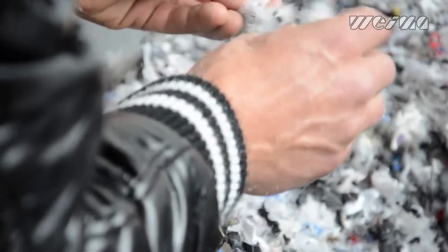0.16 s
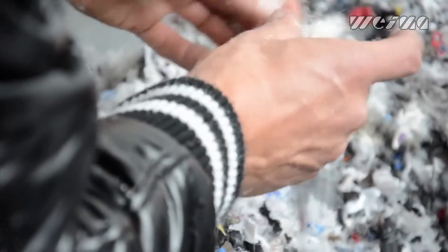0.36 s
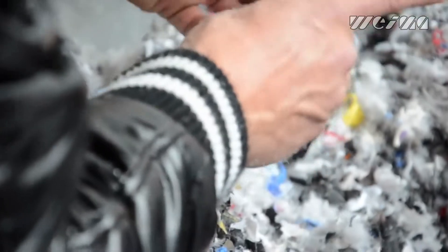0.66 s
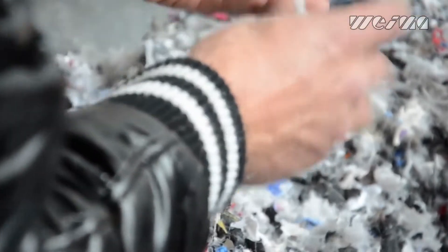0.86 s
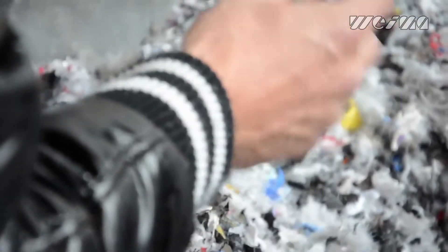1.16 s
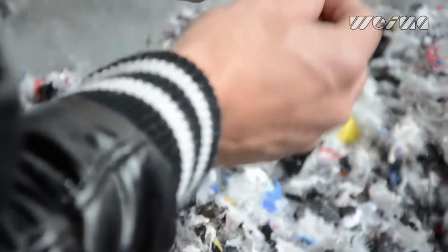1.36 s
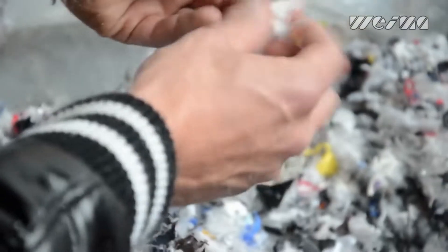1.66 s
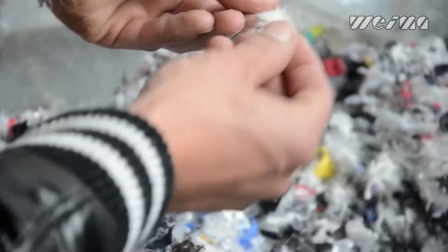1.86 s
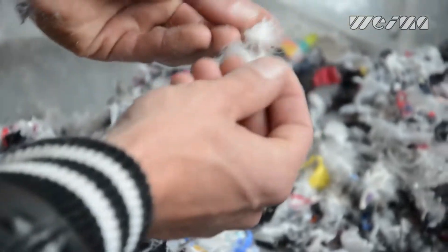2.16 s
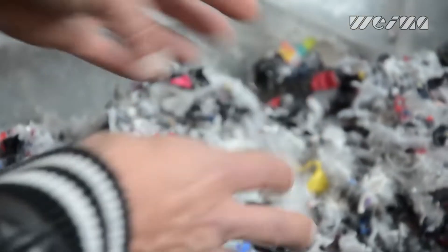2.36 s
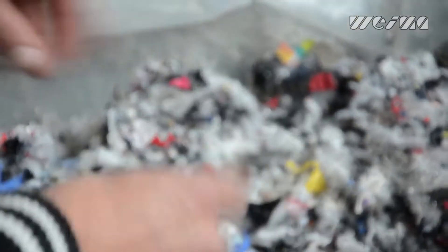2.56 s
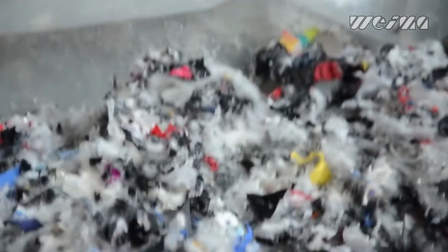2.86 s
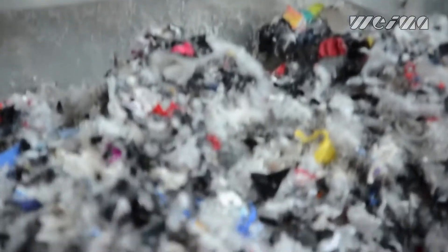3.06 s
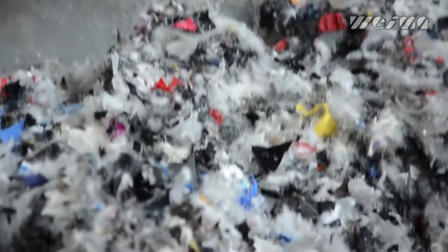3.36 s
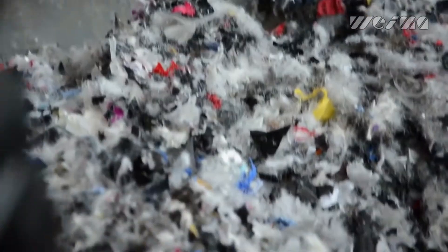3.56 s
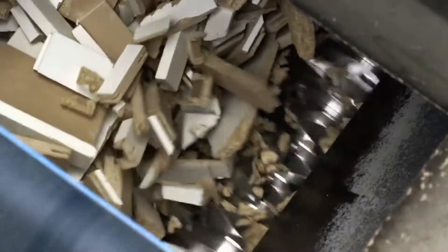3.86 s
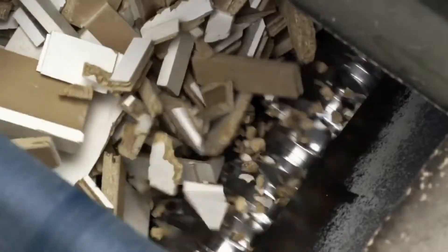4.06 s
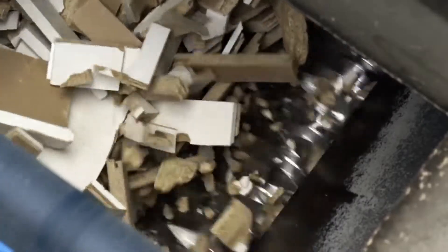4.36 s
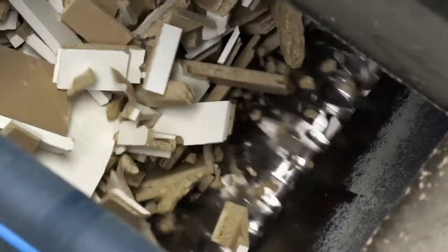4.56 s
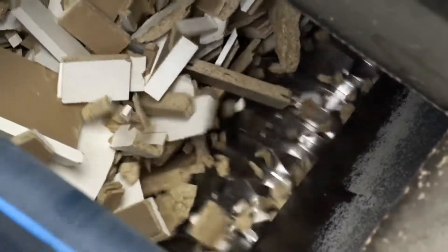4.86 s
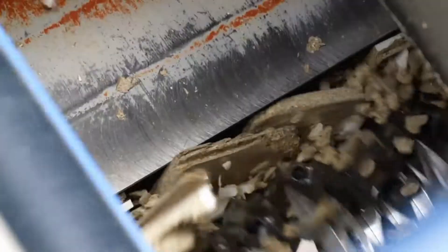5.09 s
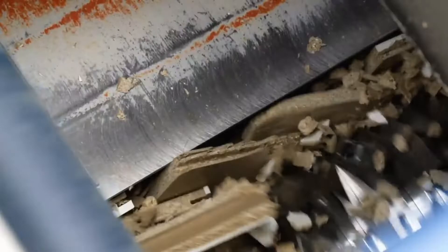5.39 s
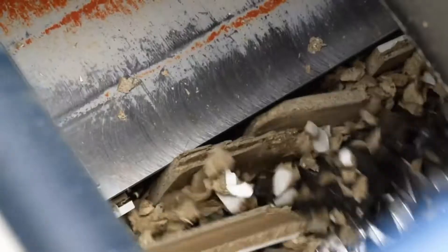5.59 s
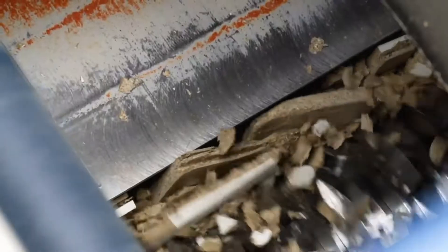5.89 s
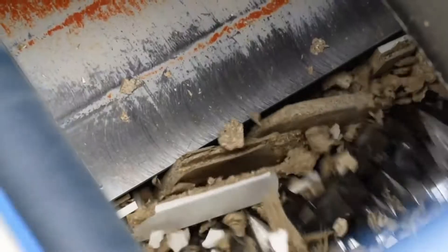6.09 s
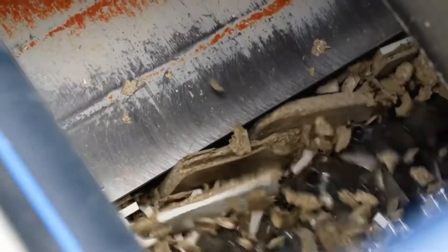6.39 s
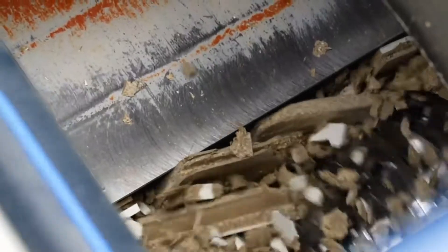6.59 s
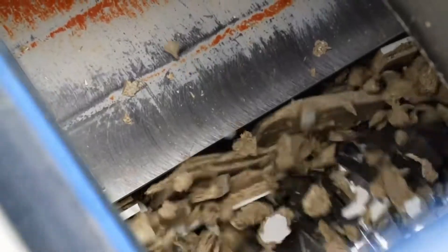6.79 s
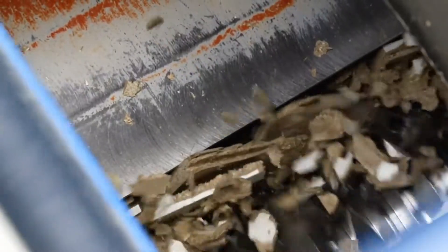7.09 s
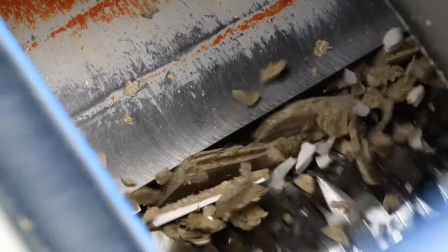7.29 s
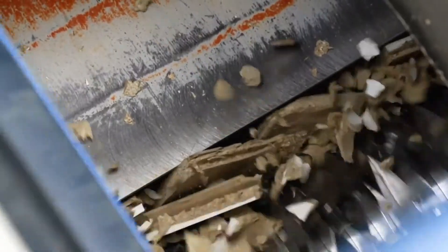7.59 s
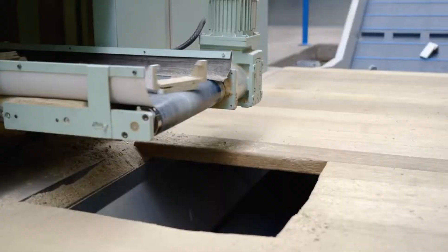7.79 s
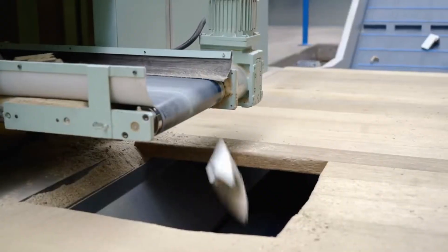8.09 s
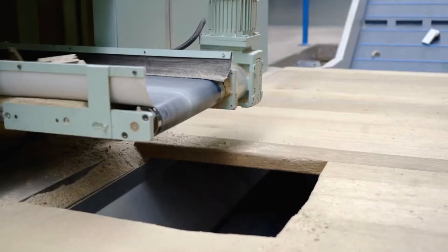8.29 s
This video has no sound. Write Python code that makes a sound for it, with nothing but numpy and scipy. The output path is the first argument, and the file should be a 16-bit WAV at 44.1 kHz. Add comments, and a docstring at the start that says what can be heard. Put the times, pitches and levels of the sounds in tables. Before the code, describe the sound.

Close stereo microphones catch a dense, full-bodied machine roar with ripping cloth and uneven bites, knocks and crisp snaps. It falls away abruptly into a low coasting rumble with muffled thuds. Then chipboard crunches and splinters over a mains hum and a quick regular rotor thump, with woody chips ticking and ringing in a steel hopper. Loose metal parts clack repeatedly near the end as the whole sound fades nearly to nothing.

```python
"""A textile shredder leads: its housing rumbles, fabric rushes and tears, lumps thud and hard scraps snap.
As it runs down, a wood shredder takes over with a mains hum and a rotor that thumps once a turn. Chipboard
grinds and splinters, chips bounce in the steel hopper and machine parts clack, in one long fade.
Shaped noise makes the roar, wavering sines the hums, and short decaying modes the knocks, chips and clacks.
Stereo microphones hear both places, with less left-right likeness in the high treble."""
import sys
import numpy as np
from scipy import signal
from scipy.fft import rfft, irfft, next_fast_len
from scipy.io import wavfile
from scipy.ndimage import uniform_filter1d

SR = 44100
rng = np.random.default_rng(int(sys.argv[2]) if len(sys.argv) > 2 else 0)


def materialize(psi):
    """Save the field psi as 16-bit PCM at rate SR to the path in sys.argv[1].

    A 1-D psi becomes a single channel; in a 2-D psi each row is a channel.
    """
    bounded = np.clip(np.atleast_2d(psi).T, -1, 1)
    quanta = np.round(bounded * 32767).astype(np.int16)
    wavfile.write(sys.argv[1], SR, quanta)


N = 372204
TIME = np.arange(N) / SR  # s
BINS = np.fft.rfftfreq(N, 1 / SR)  # Hz

# Spectra give relative level; each is scaled to an even loudness before its own level is set.
# textile shredder, rumble of the housing: (frequency [Hz], density [dB per Hz])
HOUSING_SPECTRUM = [(28, -34), (45, -27.5), (62, -19.5), (103, -10.5), (125, -9), (141, -8), (157, -8),
                    (180, 0), (215, -2), (250, -2), (303, 1.5), (322, -14), (340, -8), (380, -12)]
# level of that rumble as the feed swells and slackens: (time [s], level [dB])
RUMBLE_LEVEL = [(0, 6), (.07, 0), (.3, 0), (.62, -2), (.76, 2), (.95, 1), (1.15, 0), (1.35, 3), (1.58, -2),
                (1.72, 1.5), (1.95, 2), (2.08, -4), (2.19, 3), (2.28, -2), (2.42, 2.5), (2.49, 0), (2.6, 2),
                (2.72, 1)]
# rush of dragged fabric: (frequency [Hz], density [dB per Hz])
RUSH_SPECTRUM = [(190, -28.5), (330, -7), (368, -6.5), (429, -1.5), (490, -7.5), (924, -6.5), (1010, -11.5),
                 (1180, -10), (1740, -22), (2100, -25.5), (2730, -49), (4620, -120)]
# tearing fabric: (frequency [Hz], density [dB per Hz])
TEARING_SPECTRUM = [(1600, 16), (2050, -2), (2350, -1.5), (3100, -1.5), (3900, -4.5), (4900, -2.5),
                    (5700, -3.5), (6700, -9), (7400, -9), (8100, -7.5), (9900, -16.5), (11800, -12),
                    (14500, -17.5), (15400, -20.5)]
# the rotor bites into a wad of fabric: (start [s], length [s], extra rush [dB], extra tearing [dB])
BITES = [(0.0, 0.1, 2.5, 2), (0.412, 0.087, 0.5, 4), (0.764, 0.26, 1, 1), (1.284, 0.17, 2.5, 2.5),
         (1.633, 0.095, 4.5, 3.5), (1.783, 0.035, 3, 3), (1.914, 0.048, 3.5, 0.5), (2.184, 0.027, 5.5, 7.5),
         (2.484, 0.073, 2.5, 4.5), (2.585, 0.028, 0.5, 2)]
# the textile shredder running light: (frequency [Hz], density [dB per Hz])
COASTING_SPECTRUM = [(30, -24.5), (66, -9), (100, -4), (181, -0.5), (300, -1), (357, -9.5), (1180, -16),
                     (2050, -20.5), (2350, -18), (5700, -26), (6600, -31.5), (8200, -31), (9500, -39),
                     (12000, -37.5), (15200, -43)]
# level of the machine running light: (time [s], level [dB])
COASTING_LEVEL = [(2.68, -92), (2.78, -41.5), (3.12, -40.5), (3.35, -45.5), (3.65, -44), (3.95, -59),
                  (4.2, -110)]
# tones of the drive: (frequency [Hz], level before the drive curve [dB])
DRIVE_TONES = [(58.8, -57.5), (119.8, -48), (175.5, -55.5), (234.8, -48.5), (705, -59.5), (2351, -67.5),
               (4224, -69.5), (4986, -75)]
# drive curve, falling as the load drops away: (time [s], level [dB])
DRIVE_LEVEL = [(0, 3), (2.72, 3.5), (2.9, -10), (3.5, -11), (3.9, -53), (4.2, -90)]
# lumps knocking in the cutting chamber: (time [s], level [dB], pitch [Hz], spread [Hz], t60 [s])
LUMPS = [(.505, -46.5, 1260, 502, 0.041), (.842, -44, 990, 302, 0.064), (1.644, -49, 850, 706, 0.095),
         (1.70, -47.5, 814, 720, 0.13), (1.797, -44, 880, 298, 0.063), (1.941, -51, 880, 300, 0.077),
         (2.198, -39.5, 596, 647, 0.25), (2.411, -44, 700, 249, .07), (2.578, -46.5, 1110, 351, 0.077),
         (2.633, -52, 880, 299, 0.062), (2.72, -36.5, 173, 35, 0.22), (2.805, -43.5, 274, 70.5, 0.085),
         (2.878, -39, 250, 79.8, 0.092), (2.952, -37.5, 210, 100, 0.043), (3.01, -42, 115, 70.2, 0.14),
         (3.058, -42, 190, 90, 0.085), (3.222, -45, 200, 130, .06), (3.31, -45.5, 160, 100, .06),
         (3.425, -55, 260, 79.8, 0.2), (3.04, -48.5, 1100, 500, 0.22), (3.12, -45.5, 1160, 447, 0.27),
         (3.14, -51, 1113, 500, 0.25), (3.535, -45.5, 780, 604, 0.27), (3.566, -51, 780, 600, 0.51),
         (3.6, -46, 428, 70, 0.2), (3.768, -51, 990, 250, 0.076)]
# hard scraps snapping: (time [s], level before SNAP_TRIM_DB [dB], pitch [Hz], spread [Hz], t60 [s])
SNAPS = [(.245, -47, 2820, 900, .03), (.426, -49, 2020, 700, .04), (.462, -55, 4930, 2000, .04),
         (.503, -41, 4760, 2700, 0.04), (.586, -49, 1770, 600, .03), (.621, -46.5, 3780, 1200, .05),
         (.815, -47.5, 2420, 805, 0.067), (1.288, -53, 3500, 1100, .04), (1.434, -45, 1760, 600, .04),
         (1.623, -47.5, 5600, 1500, .03), (1.638, -45.5, 4500, 2950, 0.061),
         (1.667, -46.5, 3280, 1780, .05), (1.702, -50.5, 2220, 900, .04), (1.781, -47, 3250, 900, .04),
         (1.808, -46, 3360, 886, 0.044), (1.852, -51, 3130, 900, 0.032), (2.089, -49.5, 3530, 1000, .03),
         (2.16, -45, 5600, 1500, .04), (2.189, -49, 4020, 2960, .12), (2.213, -47.5, 4370, 1500, .04),
         (2.229, -52, 1750, 700, .04), (2.479, -47.5, 1570, 503, 0.054), (2.532, -49.5, 2470, 800, .04),
         (2.623, -43, 3110, 890, .05), (2.808, -52, 2800, 1000, .05), (2.851, -51, 5030, 1390, .04),
         (2.942, -54, 3100, 1000, .04), (3.175, -50, 3150, 990, .04), (3.372, -57, 4370, 1300, .04),
         (3.535, -47.5, 3280, 2080, 0.066), (3.572, -49, 2620, 1470, 0.061), (3.671, -52, 2180, 900, .06),
         (3.771, -59.5, 3170, 1000, .04), (3.84, -53, 2490, 800, 0.069)]
# wood shredder, mains hum: (frequency [Hz], level relative to HUM_DB [dB])
HUM_TONES = [(58.4, -8.5), (120, 3), (180, -7.5), (240, -2.5), (360, -9), (479, -33)]
# shaking steel frame: (frequency [Hz], density [dB per Hz])
FRAME_SPECTRUM = [(25, -10), (42, -22), (60, -7), (85, -8), (125, -3), (145, -2.5), (175, -3.5),
                  (215, -4.5), (260, 1), (300, 3), (340, -6), (420, -5), (520, -13.5)]
# the rotor labours on a thick board: (time [s], extra level [dB])
LABOUR_LEVEL = [(4.38, 0), (4.5, 2), (4.78, 1.5), (4.88, 0.5)]
# grinding chipboard: (frequency [Hz], density [dB per Hz])
GRINDING_SPECTRUM = [(450, -13), (523, 4.5), (714, 3.5), (928, 0), (1010, -4.5), (1180, -2.5), (1390, -4.5),
                     (1540, 0.5), (1700, -18), (2000, -15)]
# splintering chipboard: (frequency [Hz], density [dB per Hz])
SPLINTERING_SPECTRUM = [(1790, 1.5), (2080, -8), (2330, -2.5), (3100, -7.5), (3750, -12), (4500, -7.5),
                        (5820, -10), (6520, -16.5), (8180, -13.5), (9970, -24), (11500, -18), (13000, -22),
                        (13700, -23), (15200, -42)]
# larger chips landing in the hopper:
# (time [s], level before the fade [dB], pitch [Hz], hopper echo before HOPPER_DB [dB])
CHIPS = [(3.910, -61, 3930, -9), (3.957, -55, 1570, -2), (3.958, -56, 6400, -4), (4.049, -56.5, 2560, -1),
         (4.071, -56.5, 1120, -6), (4.159, -61, 3140, -3), (4.214, -62, 5600, -3), (4.236, -61, 10700, -4),
         (4.292, -54, 4380, -3), (4.298, -57, 2460, -6), (4.348, -52.5, 7600, -3), (4.471, -51, 3220, -12),
         (4.482, -54, 2960, -9), (4.543, -58, 2750, -5), (4.574, -58, 7460, -8), (4.586, -63, 2200, -7),
         (4.687, -65, 2480, -8), (4.704, -58, 5460, 1), (4.764, -56.5, 3940, -4), (4.917, -59.5, 1600, 2),
         (4.966, -50.5, 2950, -4), (4.988, -51.5, 4950, -7), (5.068, -57, 2790, 3), (5.075, -53, 4140, 0),
         (5.102, -60, 5560, -3), (5.200, -59, 3270, -5), (5.167, -60, 9400, -3), (5.169, -49, 4600, -2.5),
         (5.218, -54, 1425, 3), (5.232, -60, 8600, 0), (5.236, -57, 2950, -4), (5.350, -62, 9900, -8),
         (5.381, -63, 3860, 0), (5.39, -57, 1140, -3), (5.402, -62, 2660, -1), (5.420, -54, 2350, -2),
         (5.423, -58, 1580, -12), (5.492, -60.5, 7200, -3), (5.544, -46.5, 2450, -9), (5.569, -55, 1430, 4),
         (5.576, -53.5, 3270, -7), (5.577, -64, 8700, -2), (5.600, -57, 2550, -9), (5.658, -61, 3900, 1),
         (5.693, -52.5, 1087, -2), (5.694, -63, 3530, -5), (5.712, -56.5, 3250, -9), (5.759, -54, 2430, -4),
         (5.772, -54, 2470, -13), (5.822, -52, 1710, -12), (5.846, -65, 1610, -4), (5.865, -59, 1770, -14),
         (5.940, -66, 7640, 0), (5.963, -66, 8950, -2), (5.973, -58.5, 1480, -4), (6.000, -57, 1230, -3),
         (6.005, -53, 2710, 1), (6.029, -58, 3050, -2), (6.056, -59, 2340, -2), (6.067, -62, 2490, -4),
         (6.075, -48, 1546, 1), (6.086, -50, 1610, -5), (6.087, -66, 8000, -8), (6.097, -62, 2350, -1),
         (6.114, -63, 1770, 0), (6.220, -57, 3920, -2), (6.281, -62, 5740, -1), (6.294, -58, 1620, -1),
         (6.307, -58, 4350, -2), (6.390, -47.5, 1334, 3), (6.396, -62, 3670, 4), (6.419, -60, 2220, -4),
         (6.449, -65, 6310, 2), (6.462, -48, 1610, -1), (6.475, -52.5, 2990, 5.5), (6.475, -63, 6160, 1),
         (6.500, -62, 1650, -5), (6.553, -50, 2450, -6), (6.561, -54, 2470, -2), (6.597, -57, 2410, -3),
         (6.632, -63, 2860, -1), (6.676, -55, 2330, -13), (6.782, -61, 2220, -1), (6.800, -62, 4340, -1),
         (6.803, -59, 11100, -6.5), (6.832, -55, 2720, 0), (6.922, -58.5, 2790, 0), (6.927, -62, 3680, 1),
         (6.934, -62, 9790, 0), (6.953, -61, 5740, 1), (7.018, -62, 5600, -1), (7.033, -62, 7750, -5),
         (7.045, -55.5, 2060, -5), (7.123, -62, 4500, 3), (7.191, -53.5, 4820, -2), (7.214, -61, 2290, 6),
         (7.297, -51, 3390, -6), (7.427, -58.5, 3540, 3), (7.478, -58, 2530, 6), (7.515, -60, 2470, -5),
         (7.549, -57, 9100, -10), (7.555, -55, 4290, 1), (7.582, -57, 3630, 1), (7.683, -58, 2940, 1),
         (7.693, -56.5, 5460, 1), (7.694, -57, 1750, 2), (7.793, -56, 3830, -2), (7.815, -64, 5600, -3),
         (7.951, -63, 5730, -3), (7.964, -57, 3300, -3), (7.987, -48.5, 1580, -1), (8.002, -51, 2320, 7),
         (8.004, -53, 6700, -5), (8.051, -52, 4290, -3), (8.216, -60, 2490, 0)]
# ring of a chip: (multiple of its pitch [ratio], relative level [dB])
CHIP_MODES = [(.42, -17), (.58, -14), (.74, -12), (.87, -8), (.95, -4), (1, 0), (1.06, -4), (1.16, -9),
              (1.42, -14), (2.05, -18)]
# machine parts clack, now and then, later twice and then three times a turn:
# (time [s], peak level before the fade [dB])
CLACKS = [(4.459, -44.5), (4.483, -39), (4.636, -46), (4.769, -45), (5.124, -44), (5.299, -45),
          (5.463, -49), (6.152, -47), (6.278, -44), (6.350, -49), (6.701, -45.5), (6.802, -51),
          (6.890, -46), (6.976, -44), (7.066, -45), (7.159, -47.5), (7.248, -44), (7.343, -45),
          (7.434, -42), (7.529, -45), (7.643, -42.5), (7.718, -43.5), (7.784, -45.5), (7.852, -44),
          (7.908, -46), (7.973, -42), (8.077, -44), (8.145, -42), (8.202, -43), (8.264, -39.5),
          (8.326, -41.5)]
# ring of the clacking parts: (frequency [Hz], relative level [dB], t60 [s])
CLACK_MODES = [(290, -3, .03), (1183, -4, 0.063), (1384, 1.5, 0.049), (1470, 5, 0.059), (1835, 3, 0.038),
               (2060, -5, 0.017), (2350, 7.5, 0.024), (2660, 0.5, 0.023), (2950, -5, .01),
               (3460, -9, 0.0069), (4170, 2, 0.006), (5730, 3, 0.0045), (7800, -5, 0.0028)]
# grit and crumbs ticking on the hopper walls: (frequency [Hz], density [dB per Hz])
GRIT_SPECTRUM = [(900, 0), (1500, 2.5), (2600, -0.5), (4200, -12), (6000, -16), (9000, -28), (14000, -27)]
# likeness of the two microphones: (frequency [Hz], left-right likeness [0 to 1])
ALIKE = [(40, 0.66), (120, 0.73), (280, 0.95), (650, 0.83), (1300, 0.81), (2400, 0.86), (4400, 0.73),
         (8000, .42), (14500, .1)]
# balance of the two microphones: (frequency [Hz], left minus right [dB])
LEFT_BALANCE = [(40, 12.5), (70, -5.5), (130, -1.5), (260, 1), (1000, 2), (2200, 0.8), (4000, 2.2),
                (8000, 1.5), (12000, 3.5)]

# textile shredder's base levels, before the bites and the rumble curve
RUMBLE_DB, RUSH_DB, TEARING_DB = -34, -42.5, -47.5
BITE_ATTACK_S, BITE_RELEASE_S = 0.022, 0.078
RUMBLE_FOLLOWS = .3  # dB of rumble for each dB of extra rush
RUMBLE_UNEVEN_DB, ROAR_UNEVEN_DB, UNEVEN_HZ = .5, 0.13, 3.2  # the feed is never quite even
SNAP_TRIM_DB = -1.0
THUD_WIDTH = .25  # side over mid

# wood shredder's base levels, before the fade
HUM_DB, ROTOR_DB, GRINDING_DB, SPLINTERING_DB, GRIT_DB = -60.5, -56.5, -64, -69, -71.5
# it comes in grinding harder, settles, and fades until almost silent
WOOD_IN_S, WOOD_FULL_S, NEAR_SILENT_S, FADE_POWER = 3.6, 3.89, 8.41, 1.077
GRIND_SURGE_DB, SPLINTER_SURGE_DB, SETTLE_S = 4.5, 8, 1
TURN_HZ, FIRST_THUMP_S = 5.462, 3.641
THUMP_S, THUMP_SLOP_S = .023, .004  # half-width of a thump and its wandering in time
SHAKE_SWELL_DB = 2.8  # the frame shakes harder during each thump

# small chips fly at random; the higher their pitch, the softer they ring (levels before the fade)
SMALL_PER_S, SMALL_LOW_HZ, SMALL_HIGH_HZ = 40, 1106, 12030
SMALL_DB, SMALL_DB_PER_OCTAVE, SMALL_UNEVEN_DB, SMALL_ECHO_DB = -63, -3.5, 5.5, -4
# a chip of pitch CHIP_HZ has these times; they shrink with pitch by the power CHIP_SHORTENING
CHIP_HZ, CHIP_T60_S, CHIP_RISE_S, CHIP_SHORTENING = 2500, .036, .0028, .5
CHIP_SIDE_DAMPING = 3  # extra damping of a mode for each octave it lies from the chip's pitch
CHIP_LEAD_CYCLES = 3  # each chip starts this many cycles of its pitch before its listed time
TICK_DB, TICK_S = -11, 0.0008  # the tick of first contact
SCUFF_DB, SCUFF_S, SCUFF_OCTAVES = -11, .006, .4  # the rough broken edge scuffs the steel
# a chip bounces on, softer each time, after gaps that tend to shrink
BOUNCES, BOUNCE_S, BOUNCE_SHRINK, BOUNCE_DB, BOUNCE_STEP_DB = 3, .036, .7, -14, -2
HOPPER_DB, HOPPER_T60_S, HOPPER_BUILD_S = 1, 0.15, 0.0029  # the hopper's echo
CHIP_WIDTH, ECHO_WIDTH = 0.36, 0.57  # side over mid; the chip's is then varied at random
RATTLE_S, CLACK_ECHO_DB, CLACK_ECHO_S = .0018, -25, 0.022  # rattle of a clack and its faint echo
GRIT_PER_S, GRIT_SPREAD_DB, GRIT_T60_S = 110, 3, .04
EDGE_HZ = 15400  # upper limit of the microphones' band


def textile_shredder():
    """The rotor drums on the housing, drags fabric through the screen and tears it, then runs light."""
    rush_db, tear_db = bites()
    housing = coloured(rng.standard_normal((2, N)), HOUSING_SPECTRUM, 25, 353)
    housing = amp(RUMBLE_UNEVEN_DB * drift(UNEVEN_HZ)) * housing
    dragging = coloured(crunch(900, 1.7, 0.1, 0.4, 0.044), RUSH_SPECTRUM, 416, 1800)
    tearing = coloured(crunch(1200, 1.48, 0.56, 1.1, 0.042), TEARING_SPECTRUM, 1960, 16000)
    loaded = amp(RUMBLE_DB + RUMBLE_FOLLOWS * rush_db) * level(RUMBLE_LEVEL) * housing
    loaded = loaded + amp(RUSH_DB + rush_db) * dragging + amp(TEARING_DB + tear_db) * tearing
    uneven = amp(ROAR_UNEVEN_DB * drift(UNEVEN_HZ))
    load_ends = np.interp(TIME, [2.72, 2.85], [1, 0])
    coasting = coloured(crunch(900, 3.7, 0.34, 1.87, 0.11), COASTING_SPECTRUM, 25, 16000)
    light = level(COASTING_LEVEL) * coasting
    drive = level(DRIVE_LEVEL) * tones(DRIVE_TONES, 2.2, 0.14)
    lumps = thuds(LUMPS, rise_s=0.0025, ring_db=-3.5, ring_hold=1.3)
    snaps = amp(SNAP_TRIM_DB) * strikes(SNAPS, 0.0021, -14.5, -2.9, 0.062, 0.28)
    return loaded * uneven * load_ends + light + drive + lumps + snaps


def bites():
    """Extra rush and tearing in dB: each wad loads the rotor quickly and lets go more slowly."""
    rush_db, tear_db = np.zeros((2, N))
    for s, length, rush, tear in BITES:
        attack = (TIME - s) / BITE_ATTACK_S + .5
        release = (s + length - TIME) / BITE_RELEASE_S + .5
        load = np.clip(np.minimum(attack, release), 0, 1)
        rush_db, tear_db = rush_db + rush * load, tear_db + tear * load
    return rush_db, tear_db


def thuds(table, rise_s, ring_db, ring_hold):
    """Soft lumps hit the chamber: a blurred thud in a wide band, with a narrower, longer ring of the steel."""
    out, t = np.zeros((2, N)), np.arange(2 ** 14) / SR
    f = np.fft.rfftfreq(len(t), 1 / SR)
    for s, db, hz, spread_hz, t60 in table:
        noise = rfft(rng.standard_normal((2, 2, len(t))))
        away = ((f - hz) / spread_hz) ** 2
        no_sub = 1 / (1 + (.45 * hz / (f + 1)) ** 6)  # thins out what lies far below the pitch
        blow = evened(irfft(no_sub * noise[0] / (1 + away ** 2)))
        ring = evened(irfft(no_sub * noise[1] / (1 + 16 * away)))
        body = blow * dying(t, t60) + amp(ring_db) * ring * dying(t, t60 * ring_hold)
        mid, side = body * (1 - np.exp(-t / rise_s))
        add(out, s, amp(db) * stereo(mid, THUD_WIDTH * side) / mid[:SR // 50].std())
    return out


def strikes(table, rise_s, crack_db, hopper_db, hopper_t60, width):
    """Each struck piece cracks, rings in a cluster of close modes and echoes in the steel hopper."""
    out, t = np.zeros((2, N)), np.arange(2 ** 14) / SR
    f = np.fft.rfftfreq(len(t), 1 / SR)
    for s, db, hz, spread_hz, t60 in table:
        noise = rfft(rng.standard_normal((2, len(t))))
        # nine modes straddle the piece's pitch, the outer ones weaker
        offsets = (np.arange(-4, 5) + rng.uniform(-.5, .5, 9)) / 4
        cycles = np.outer(hz + spread_hz * offsets, t) + rng.random((len(offsets), 1))
        weights = rng.choice([-1, 1], (2, len(offsets))) / (1 + (2 * offsets) ** 2)
        ring = evened(weights @ np.sin(2 * np.pi * cycles)) * dying(t, t60)
        echo = evened(irfft(noise / (1 + ((f - hz) / spread_hz) ** 2))) * dying(t, hopper_t60)
        crack = evened(irfft(noise / (1 + np.log2((f + 1) / hz) ** 4))) * np.exp(-t / 0.0025)
        body = (ring + amp(hopper_db) * echo) * (1 - np.exp(-t / rise_s))
        mid, side = body + amp(crack_db) * crack
        add(out, s, amp(db) * stereo(mid, width * side) / mid[:SR // 100].std())
    return out


def wood_shredder():
    """Motor hum and rotor under grinding chipboard, chips, grit and clacks, all in one long fade."""
    surge = np.exp(-np.maximum(TIME - WOOD_FULL_S, 0) / SETTLE_S)
    # the labour curve acts here on the whole rotor and again on its shake
    turning = amp(ROTOR_DB) * level(LABOUR_LEVEL) * rotor(0.23, 9.1, 245.5)
    grinding = coloured(crunch(300, 1.3, 0.2, 2.5, 0.11), GRINDING_SPECTRUM, 590, 1470)
    grinding = amp(GRINDING_DB + GRIND_SURGE_DB * surge) * grinding
    splintering = coloured(crunch(220, 3.2, .3, 2.0, .05), SPLINTERING_SPECTRUM, 1700, 16000)
    splintering = amp(SPLINTERING_DB + SPLINTER_SURGE_DB * surge) * splintering
    grit = crunch(GRIT_PER_S, GRIT_SPREAD_DB, 0.99, 2.6, GRIT_T60_S)
    grit = amp(GRIT_DB) * coloured(grit, GRIT_SPECTRUM, 900, 15000)
    hum = amp(HUM_DB) * tones(HUM_TONES, 0.61, 0.094)
    fade = np.interp(TIME, [WOOD_IN_S, WOOD_FULL_S, NEAR_SILENT_S], [0, 1, .002]) ** FADE_POWER
    return fade * (turning + grinding + splintering + flying_chips() + clacks(0.23, 3.3) + grit + hum)


def rotor(repeat, thump_db, thump_hz):
    """The knives shake the frame in a partly repeating pattern; one loose thump marks each turn."""
    period = round(SR / TURN_HZ)
    knives = rng.standard_normal((2, period))[:, np.arange(N) % period]
    repeat = np.clip(repeat, 0, 1)  # share of the shake that is the same on every turn
    shake = np.sqrt(repeat) * knives + np.sqrt(1 - repeat) * rng.standard_normal((2, N))
    shake = coloured(shake, FRAME_SPECTRUM, 20, 487)
    # seconds from the nearest thump
    since = ((TIME - FIRST_THUMP_S) * TURN_HZ + .5) % 1 / TURN_HZ - .5 / TURN_HZ
    push = np.exp(-((since + THUMP_SLOP_S * drift(6.0)) / THUMP_S) ** 2)
    tone = np.sin(2 * np.pi * thump_hz * since + .5 * drift(25))
    thump = amp(thump_db + 2.0 * drift(4.2)) * push * tone
    return level(LABOUR_LEVEL) * amp(SHAKE_SWELL_DB * push) * shake + thump


def flying_chips():
    """Each chip lands with a tick and a short woody ring, bounces on, and is scattered by the steel hopper."""
    out, t = np.zeros((2, N)), np.arange(2 ** 13) / SR
    hopper = (1 - np.exp(-(t / HOPPER_BUILD_S) ** 2)) * dying(t, HOPPER_T60_S)
    for s, db, hz, echo_db in CHIPS + small_chips():
        direct = np.zeros((1, len(t)))
        add(direct, 0, chip_contact(hz))
        gaps = BOUNCE_S * BOUNCE_SHRINK ** np.arange(BOUNCES) * rng.uniform(.5, 1.5, BOUNCES)
        for k, delay in enumerate(np.cumsum(gaps)):
            add(direct, delay, amp(BOUNCE_DB + BOUNCE_STEP_DB * k) * chip_contact(hz))
        direct = evened(direct[0])
        echoes = []
        for _ in range(2):  # mid, then side
            scattered = signal.fftconvolve(direct, hopper * rng.standard_normal(len(t)))[:len(t)]
            echoes.append(amp(HOPPER_DB + echo_db) * evened(scattered))
        mid = direct + echoes[0]
        side = CHIP_WIDTH * rng.uniform(-1.1, 1) * direct + ECHO_WIDTH * echoes[1]
        loudest = np.sqrt(uniform_filter1d(mid ** 2, size=264).max())  # over 6 ms
        add(out, s - CHIP_LEAD_CYCLES / hz, amp(db) * stereo(mid, side) / loudest)
    return out


def small_chips():
    """A random spray of small chips, as rows like those of CHIPS."""
    slot = np.arange(WOOD_IN_S, NEAR_SILENT_S, 1 / SMALL_PER_S)
    when, size, force = rng.random((800, 3))[:len(slot)].T
    octaves = size * np.log2(SMALL_HIGH_HZ / SMALL_LOW_HZ)
    db = SMALL_DB + SMALL_DB_PER_OCTAVE * octaves + SMALL_UNEVEN_DB * (2 * force - 1)
    echo_db = np.full(len(slot), SMALL_ECHO_DB)
    return list(zip(slot + 2 * when / SMALL_PER_S, db, SMALL_LOW_HZ * 2 ** octaves, echo_db))


def chip_contact(hz):
    """One contact: a broad tick, a rough scuff, then modes of which those nearest the pitch ring longest."""
    t = np.arange(2 ** 11) / SR
    ratio, mode_db = np.transpose(CHIP_MODES)
    age = t * (hz / CHIP_HZ) ** CHIP_SHORTENING
    # all but the main mode stray a little
    mode_hz = hz * ratio * (1 + .035 * (ratio != 1) * rng.standard_normal(len(ratio)))
    damped_age = age * (1 + CHIP_SIDE_DAMPING * abs(np.log2(ratio)))[:, None]
    modes = np.sin(2 * np.pi * (np.outer(mode_hz, t) + rng.random((len(ratio), 1))))
    modes = modes * (1 - np.exp(-damped_age / CHIP_RISE_S)) * dying(damped_age, CHIP_T60_S)
    ring = (amp(mode_db) * (mode_hz < EDGE_HZ)) @ modes
    octaves = np.log2((np.fft.rfftfreq(len(t), 1 / SR) + 1) / hz)
    scuff = irfft(rfft(rng.standard_normal(len(t))) / (1 + (octaves / SCUFF_OCTAVES) ** 2))
    scuff = evened(scuff) * np.exp(-t / SCUFF_S)
    tick = signal.lfilter([.6, .2], [1, -.35], rng.standard_normal(len(t))) * np.exp(-t / TICK_S)
    return (ring / abs(ring).max() + amp(SCUFF_DB) * scuff + amp(TICK_DB) * tick)[None]


def clacks(width, uneven_db):
    """Loose metal parts meet with a brief rattle; each contact favours different modes."""
    out, t = np.zeros((2, N)), np.arange(2 ** 12) / SR
    modes = np.array([amp(db) * dying(t, t60) * np.sin(2 * np.pi * hz * t) for hz, db, t60 in CLACK_MODES])
    rattle = t / RATTLE_S * np.exp(-t / RATTLE_S)
    echo = amp(CLACK_ECHO_DB) * np.exp(-t / CLACK_ECHO_S)
    for s, db in CLACKS:
        ring = amp(uneven_db * rng.standard_normal(len(modes))) @ modes
        contact = rng.standard_normal((2, len(t))) * (rattle + echo)
        mid, side = signal.fftconvolve(contact, ring[None], axes=1)
        add(out, s - RATTLE_S, amp(db) * stereo(mid, width * side) / abs(mid).max())
    return out


def crunch(per_s, spread_db, share, patchy_db, tail_t60):
    """Countless small fractures of uneven size with scattered tails, mixed by share with a patchy wash."""
    sizes = amp(spread_db * np.minimum(rng.exponential(1, (2, N)), 4))
    clicks = sizes * rng.choice([-1, 1], (2, N)) * (rng.random((2, N)) < per_s / SR)
    t = np.arange(SR // 10) / SR
    # fractures at different places along the rotor scatter along different paths
    paths = rng.standard_normal((6, 2, len(t))) * dying(t, tail_t60)
    place = rng.integers(0, len(paths), N)
    scattered = np.zeros((2, N))
    for k, path in enumerate(paths):
        scattered += signal.oaconvolve(clicks * (place == k), path, axes=1)[:, :N]
    grains = evened(clicks) + amp(6.5) * evened(scattered)
    share = np.clip(share, 0, 1)
    mix = np.sqrt(share) * evened(grains) + np.sqrt(1 - share) * rng.standard_normal((2, N))
    z = signal.stft(mix, nperseg=256)[2]
    # each scrap favours its own band for a few hundredths of a second
    patches = uniform_filter1d(rng.standard_normal(z.shape[1:]), size=5, axis=0)
    patches = evened(uniform_filter1d(patches, size=8, axis=1))
    return signal.istft(z * amp(patchy_db * patches))[1][:, :N]


def tones(table, waver_db, wander):
    """Machine tones that waver at random in level (dB) and phase (radians)."""
    total = np.zeros(N)
    for hz, db in table:
        gain = amp(db + waver_db * drift(13.0)) * np.sqrt(2)
        total += gain * np.sin(2 * np.pi * (hz * TIME + rng.random()) + wander * drift(2.0))
    return total


def coloured(pair, spectrum, lo_hz, hi_hz):
    """Two unrelated signals become a stereo pair in one band, as alike at each frequency as ALIKE says."""
    alike = np.clip(read(ALIKE, BINS), 0, 1)
    band = ((1 + (lo_hz / (BINS + 1)) ** 16) * (1 + (BINS / hi_hz) ** 16)) ** -.5
    mid, side = rfft(pair) * amp(read(spectrum, BINS)) * band
    mid, side = irfft(mid, N), irfft(side * np.sqrt((1 - alike) / (1 + alike)), N)
    return stereo(mid, side) / mid.std()


def drift(rate_hz):
    """Slow chance with an rms of one."""
    coarse = rfft(rng.standard_normal(2048)) * np.exp(-(BINS[:1025] / rate_hz) ** 2)
    return evened(np.interp(TIME, np.linspace(0, TIME[-1], 2048), irfft(coarse)))


def level(rows):
    """The gain curve of a (time [s], level [dB]) table."""
    return amp(np.interp(TIME, *np.transpose(rows)))


def read(points, hz):
    """A frequency table read on a log-frequency axis."""
    f, value = np.transpose(points)
    return np.interp(np.log(hz + 1), np.log(f + 1), value)


def amp(db):
    """Decibels to gain."""
    return 10 ** (np.asarray(db) / 20)


def dying(t, t60):
    """Exponential decay by 60 dB in t60 seconds."""
    return np.exp(-np.log(1000) * t / t60)


def evened(x):
    """Scales to an rms of one."""
    return x / np.sqrt(np.mean(x ** 2) + 1e-30)


def stereo(mid, side):
    """Left and right from mid and side."""
    return np.array([mid + side, mid - side])


def add(mix, s, sound):
    """Mixes a sound in at time s."""
    part = mix[:, max(round(s * SR), 0):][:, :sound.shape[1]]
    part += sound[:, :part.shape[1]]


def scene():
    """One machine gives way to the other."""
    return textile_shredder() + wood_shredder()


def record(dry):
    """The two microphones differ in balance by frequency, and share an upper band limit."""
    size = next_fast_len(N + SR)
    tilt_db = read(LEFT_BALANCE, np.fft.rfftfreq(size, 1 / SR)) * np.array([[.5], [-.5]])
    heard = irfft(rfft(dry, size) * amp(tilt_db), size)[:, :N]
    band_limit = signal.firwin(511, EDGE_HZ, window=("kaiser", 9), fs=SR)
    return signal.oaconvolve(heard, band_limit[None], "same")


dry = scene()
out = record(dry)
materialize(out)
```